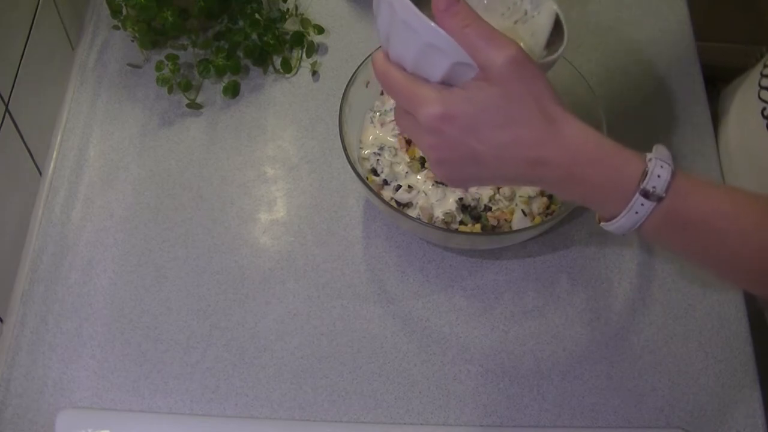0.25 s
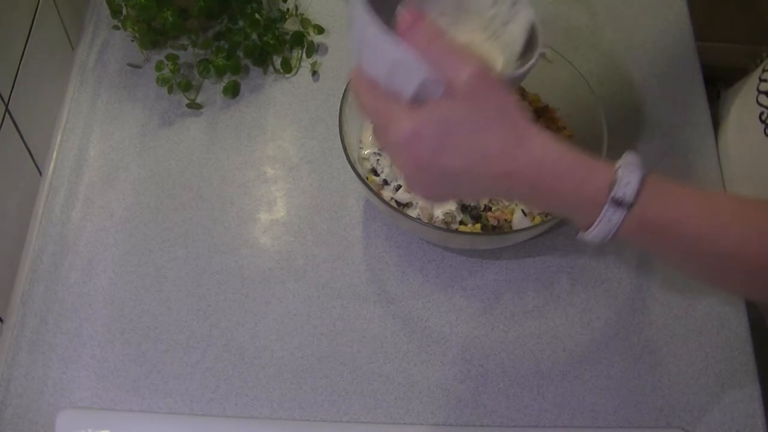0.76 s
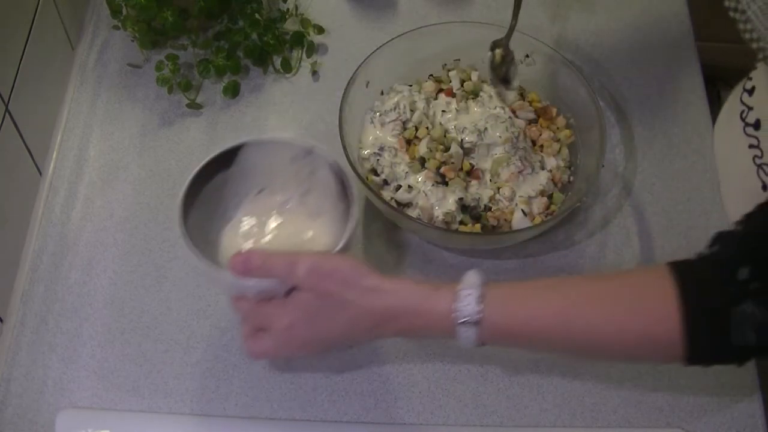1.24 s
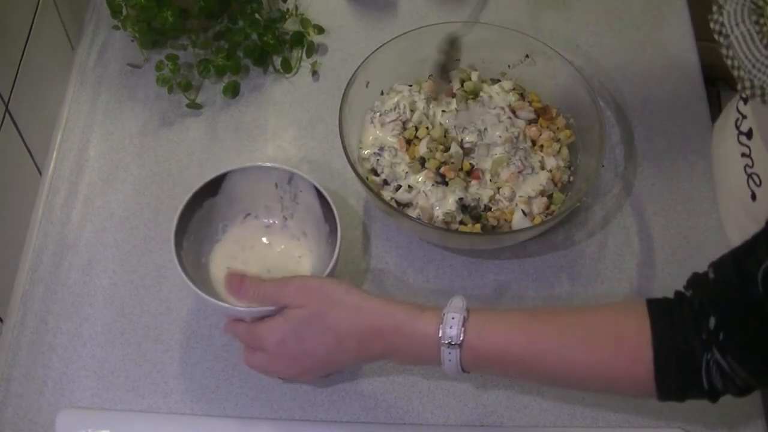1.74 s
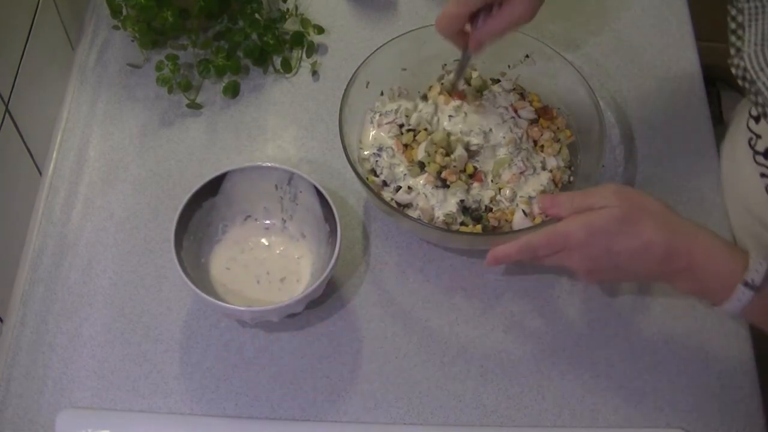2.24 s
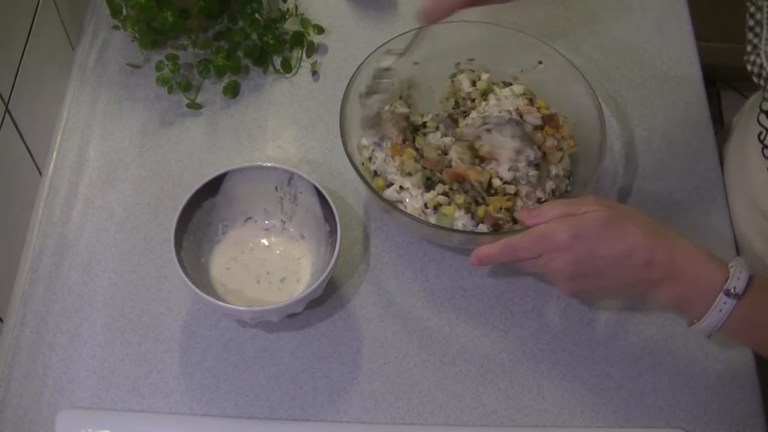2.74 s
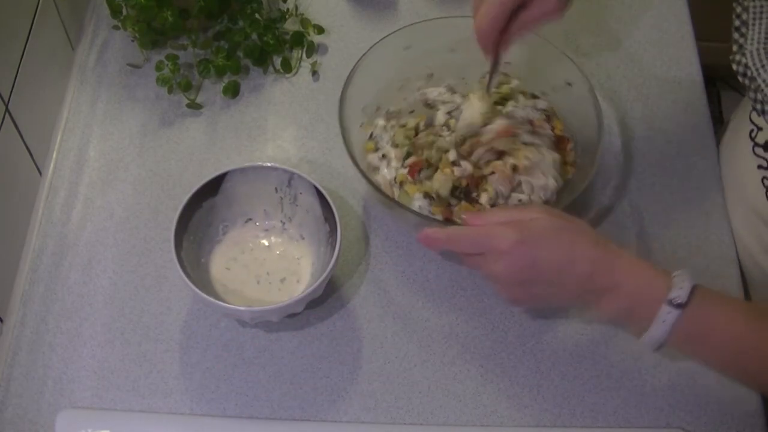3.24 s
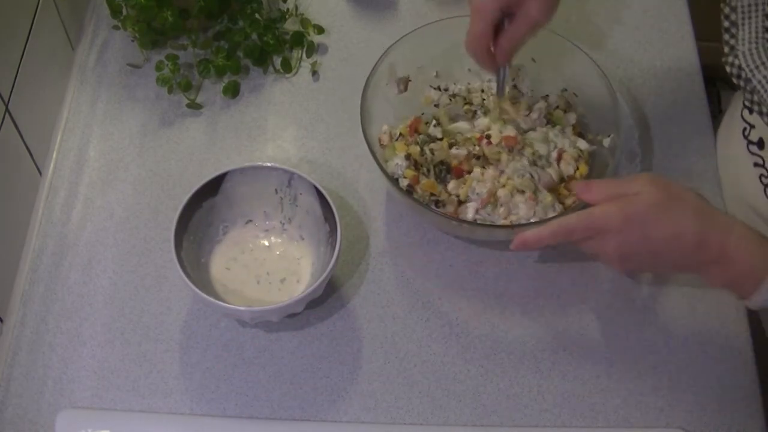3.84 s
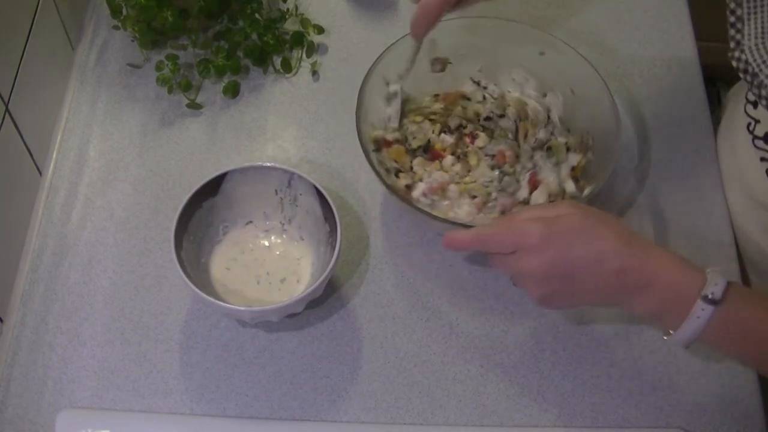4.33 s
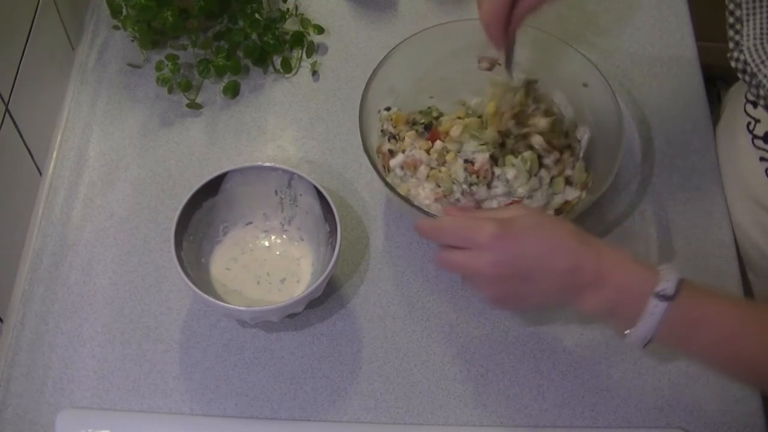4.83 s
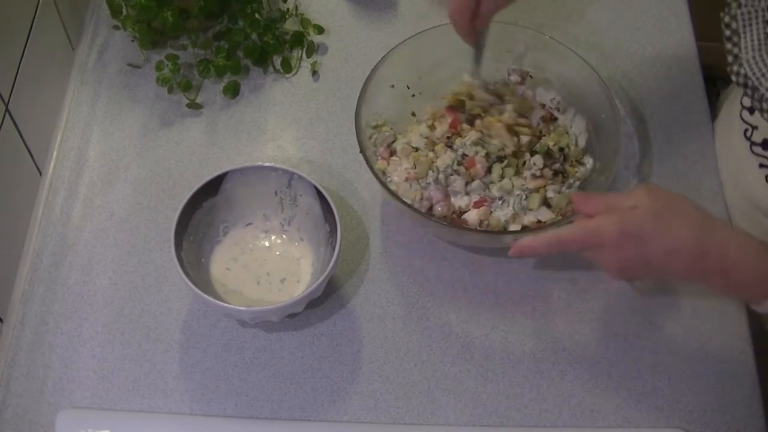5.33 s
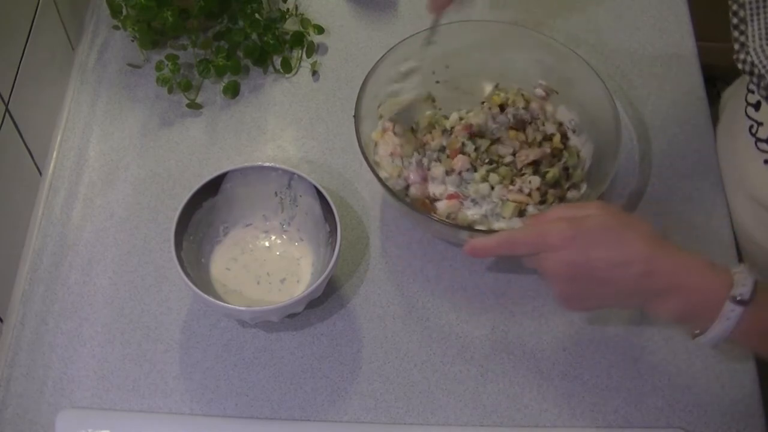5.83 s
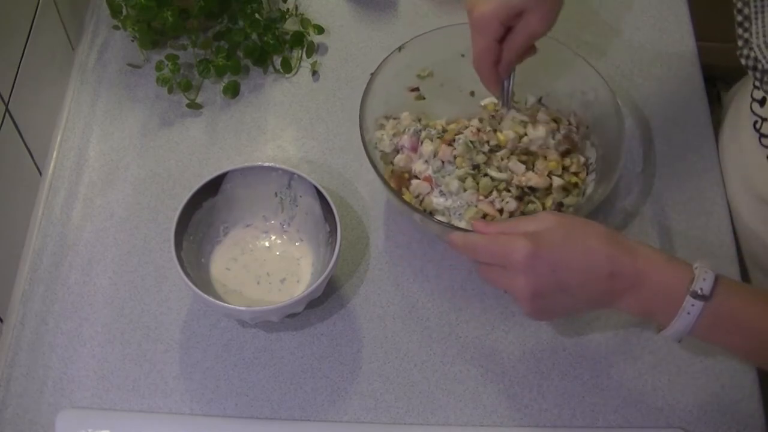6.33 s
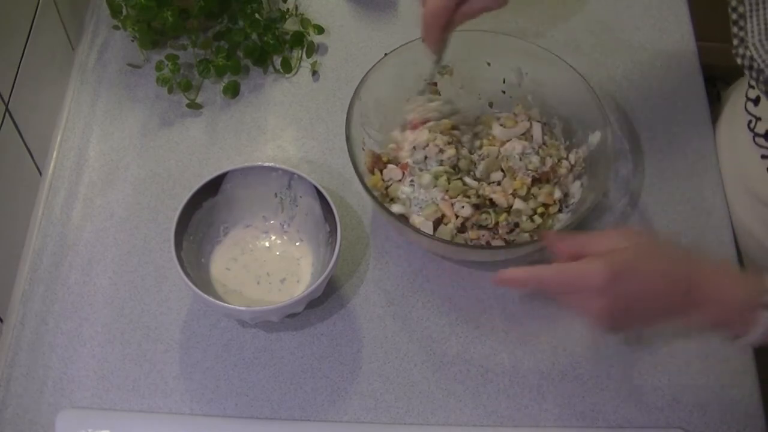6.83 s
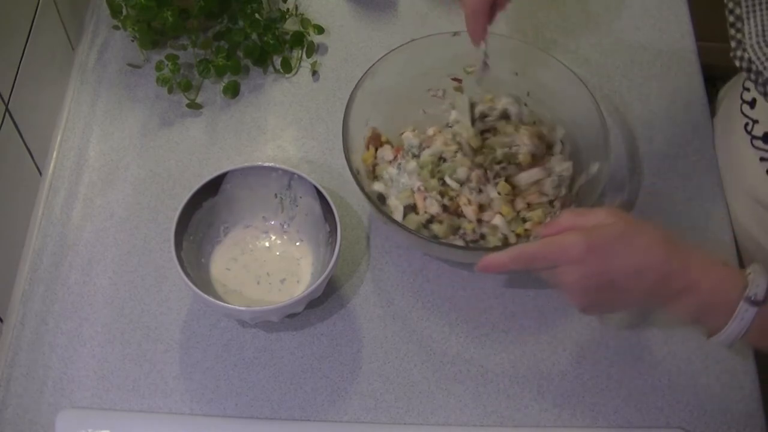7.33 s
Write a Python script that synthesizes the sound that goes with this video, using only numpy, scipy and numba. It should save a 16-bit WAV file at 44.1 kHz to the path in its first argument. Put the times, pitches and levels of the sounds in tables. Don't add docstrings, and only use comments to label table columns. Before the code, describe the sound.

A spoon taps a ceramic cup, the cup thuds onto a counter, then the spoon clinks and scrapes a glass bowl, stirring wet chopped salad.

```python
import sys
import numpy as np
from scipy import signal
from scipy.fft import rfft, irfft
from scipy.io import wavfile
from scipy.ndimage import map_coordinates
from numba import njit

SR = 44100
rng = np.random.default_rng(int(sys.argv[2]) if len(sys.argv) > 2 else 0)


def unload_audio(sound):
    columns = np.transpose(np.atleast_2d(sound))
    steps = np.round(np.clip(columns, -1, 1) * 32767)
    wavfile.write(sys.argv[1], SR, steps.astype(np.int16))


def invert_db(level):
    return 10 ** (np.asarray(level, dtype=float) / 20)


N = 333837
HZ = np.maximum(np.fft.rfftfreq(N, 1 / SR), 1)

# start_s, peak_db, brightness_db_per_octave
SET_DOWN = [
    (1.6476, -6.5, 2.5),
    (1.711, -7, -0.5),
    (1.73, -33, -9),
    (1.75, -15.5, -1),
    (1.789, -17, -2.5),
]
# start_s, peak_db, treble_db, low_db, middle_db
CLINKS = [
    (1.919, -19.5, -22, -7, -18.5),
    (3.5409, -23, -14, -15.5, -18),
    (4.354, -8, -7, -11, -21),
    (5.1534, -15.5, -5, -7, -13),
    (6.7446, -12, 3.5, -6, -2),
]
# start_s, length_s, rub_db, rumble_db
TURNS = [(2.012, 0.2, -54, -55), (2.79, 0.17, -52, -66), (3.186, 0.36, -50, -61), (4.011, 0.55, -58.5, -61),
         (4.877, 0.15, -52.5, -59.5), (5.73, 0.49, -58.5, -66), (6.46, 0.55, -55.5, -62.5),
         (7.25, 0.74, -57.5, -64.5)]
TURN_ATTACK_S, TURN_FADE_DB_PER_S = 0.083, 53
# start_s, length_s, level_db, first_hz, overtone_db
SONGS = [(2.225, 0.04, -44, 2180, 8), (2.907, 0.024, -31, 2050, -24), (2.991, 0.0063, -19.5, 2734, -16),
         (3.791, 0.084, -38, 2980, -17), (4.417, 0.12, -27.5, 2730, -2.5), (4.641, 0.02, -32.5, 3225, -14),
         (5.17, 0.069, -28, 2960, -28), (5.236, 0.035, -28, 2780, -18), (5.29, .08, -33, 2764, 1),
         (5.972, 0.118, -26, 2970, -9), (6.107, 0.034, -27, 2500, -8), (6.87, 0.099, -30, 2740, -3.5),
         (7.04, 0.03, -27, 3300, -20), (2.84, .04, -35, 3050, 0)]


def rms_one(x):
    return x / np.sqrt(np.mean(x ** 2) + 1e-20)


def in_time(rows):
    s, *columns = np.transpose(rows)
    return [np.interp(np.arange(N) / SR, s, c) for c in columns]


def at_hz(points, hz):
    return np.interp(np.log(hz), np.log(np.array(points)[:, 0]), np.array(points)[:, 1])


def coloured(x, spectrum):
    return rms_one(irfft(rfft(x) * invert_db(at_hz(spectrum, HZ)), N))


def drift(rate_per_s):
    knots = rng.standard_normal(4000)
    return map_coordinates(knots, [np.arange(N) * rate_per_s / SR % 3990], order=1)


def grains(per_s, spread_db):
    sizes = invert_db(spread_db * np.minimum(rng.exponential(1, N), 4))
    signs = rng.choice([-1, 1], N)
    return rms_one(sizes * signs * (rng.random(N) < per_s / SR))


def ring(clicks, hz, t60_s):
    r = invert_db(-60 / (max(t60_s, .002) * SR))
    w = 2 * np.pi * hz / SR
    return signal.lfilter([0, np.sin(w)], [1, -2 * r * np.cos(w), r * r], clicks + 1e-18)


@njit
def glide(x, turn, r):
    y = np.zeros(len(x))
    for i in range(2, len(x)):
        y[i] = x[i] - x[i - 2] + 2 * r * turn[i] * y[i - 1] - r * r * y[i - 2]
    return y


def moving_ring(x, hz, width_hz):
    return rms_one(glide(x, np.cos(2 * np.pi * hz / SR), np.exp(-np.pi * width_hz / SR)))


def band(x, low_hz, high_hz):
    return rms_one(signal.sosfilt(signal.butter(4, [low_hz, high_hz], "band", fs=SR, output="sos"), x))


def in_band(x, low_hz, high_hz):
    return signal.sosfilt(signal.butter(2, [low_hz, high_hz], "band", fs=SR, output="sos"), x)


def above(x, hz):
    return signal.sosfilt(signal.butter(3, hz, "high", fs=SR, output="sos"), x)


def train(rows, db):
    clicks = np.zeros(N)
    clicks[[round(row[0] * SR) for row in rows]] = invert_db(db)
    return clicks


def swells(rows, db, attack_s, fade_db_per_s):
    t, gain = np.arange(0, N + 16, 16) / SR, 0
    for (s, length_s, *_), level_db in zip(rows, db):
        rise = np.clip((t - s) / max(attack_s, .001), 0, 1) ** 2
        fade_db = fade_db_per_s * np.maximum(t - s - length_s, 0)
        gain = np.hypot(gain, rise * invert_db(level_db - fade_db))
    return np.interp(np.arange(N) / SR, t, gain)


def pair(alike):
    mid, side = rfft(rng.standard_normal((2, N)))
    share = np.clip(at_hz(alike, HZ), 0, 1)
    return irfft(np.sqrt(1 + share) * mid + np.sqrt(1 - share) * side * [[1], [-1]], N)


def room_floor():
    # hz, db_per_hz
    floor_spectrum = [(12, -52.5), (20, -32), (165, -15.5), (230, 1), (265, -10.5), (361, -1.5),
                      (709, -9.5), (1350, -8), (1470, -6), (2890, -1), (4410, -9.5), (5210, -6), (6710, -7),
                      (15200, -18), (16500, -22)]
    # hz, left_right_likeness
    floor_alike = [(60, 0.86), (300, 0.1), (2000, 0.38), (6000, 0.21), (14000, 0.091)]
    return invert_db(-58 + 1.4 * drift(3.8)) * coloured(pair(floor_alike), floor_spectrum)


def fan():
    # pitch_hz, width_hz, level_db
    whistles = [(2480, 260, -68), (2960, 60, -78), (5310, 90, -75), (7810, 50, -80)]
    air = rng.standard_normal((2, N))
    out = 0
    for hz, width_hz, db in whistles:
        whistle = ring(air[0] + .6 * air, hz, 2.2 / width_hz)
        out = out + invert_db(db) * rms_one(above(whistle, 1500))
    return out


def kitchen(x):
    # hz, t60_s
    room_t60 = [(150, 0.57), (600, 0.48), (2000, 0.43), (6000, 0.44), (14000, 0.28)]
    # hz, left_right_likeness
    room_alike = [(150, 0.87), (1000, 0.88), (3000, 0.82), (8000, 0.12)]
    length, edges_hz = SR * 3 // 4, 90 * 2 ** np.arange(0, 8.0)
    white, t, tail = pair(room_alike)[:, :length], np.arange(length) / SR, 0
    for low, high in zip(edges_hz, np.minimum(2 * edges_hz, .45 * SR)):
        decay = invert_db(-60 * t / at_hz(room_t60, np.sqrt(low * high)))
        tail = -tail + in_band(white, low, high) * decay
    tail = tail * np.clip(t / 0.0066 - .4, 0, 1)
    return signal.fftconvolve(x[None], tail / np.sqrt(np.sum(tail[0] ** 2)))[:, :N]


def ports(x):
    # hz, left_minus_right_db
    balance = [(60, 0.5), (110, 2.5), (200, 3), (380, -0.5), (700, 1), (1290, 0.5), (2380, 0.5), (4400, -2),
               (8120, 4.5), (15000, -1)]
    # hz, left_lead_rad
    lead = [(0, 0), (3360, 0.36), (3700, 0.75), (4570, 0.41), (5510, 1), (6800, -2.55), (8100, 0.99),
            (9390, 1), (9990, -1.8), (11000, 1), (13200, 1), (14200, 0.62), (15300, 0.0), (16500, 0.46)]
    half = invert_db(at_hz(balance, HZ) / 2) * np.exp(.5j * at_hz(lead, HZ))
    return irfft(rfft(x) * np.array([half, 1 / half]), N)


def thump():
    blows = train(CLINKS, np.array(CLINKS)[:, 1] - 64) + train(SET_DOWN, np.array(SET_DOWN)[:, 1] - 62)
    return ring(blows, 38, 0.25) + invert_db(2) * ring(blows, 62, 0.15) + invert_db(-6) * ring(blows, 120, 0.08)


def panel():
    # mode_hz, level_db, t60_s
    panel_modes = [(337, -39, .12), (401, -23.5, 0.13), (525, -14, 0.061), (620, -24, 0.069),
                   (752, -33, 0.14), (858, -24, 0.12), (963, -22, 0.065)]
    chance_db = rng.normal(0, 2.1, (len(panel_modes), len(SET_DOWN)))
    peak_db = np.array(SET_DOWN)[:, 1]
    out = np.zeros(N)
    for (hz, db, t60_s), spread_db in zip(panel_modes, chance_db):
        out += ring(train(SET_DOWN, peak_db + db + spread_db), hz, t60_s)
    return out


def set_down():
    # hz, db_per_hz
    thud_spectrum = [(120, -40), (180, -25), (350, -7), (600, -1), (900, -2), (1400, -1.5), (2000, -5),
                     (2800, 0.5), (4000, -13), (6000, -9), (8000, -24), (15000, -26)]
    # hz, t60_s
    thud_t60 = [(200, 0.044), (1000, 0.098), (3000, 0.013), (10000, 0.0049)]
    out, span, edges_hz = np.zeros(N), SR // 4, 130 * 2 ** np.arange(0, 7, .5)
    t, click = np.arange(span) / SR, signal.unit_impulse(span)
    for s, db, tilt_db in SET_DOWN:
        thud, white = 0, rng.standard_normal(span)
        for low, high in zip(edges_hz, edges_hz[1:]):
            hz = np.sqrt(low * high)
            drive = 8.2 * click + white * invert_db(-60 * t / at_hz(thud_t60, hz))
            gain = invert_db(at_hz(thud_spectrum, hz) + tilt_db * np.log2(hz / 1000))
            thud = -thud + gain * in_band(drive, low, high)
        out[round(s * SR):][:span] += invert_db(db) * thud / np.abs(thud).max()
    return out


def cup():
    # start_s, peak_db
    taps = [
        (0.611, -15),
        (0.7018, -14.5),
    ]
    # start_s, length_s, level_db
    drags = [
        (0.607, .004, -23.5),
        (0.699, 0.0049, -20),
        (0.74, 0.038, -31.5),
        (0.818, 0.045, -67),
    ]
    # mode_hz, first_tap_db, second_tap_db, t60_s
    cup_modes = [(1176.4, -9.5, -10.5, 0.13), (2230, -13, -43, 0.12), (2496, 5.5, -19, 0.047),
                 (2553, -25, -5.5, 0.066), (2873, -12, -8, 0.055), (2954, 4, -3, 0.06),
                 (3330, -6, -13, 0.043), (3770, 4.5, -11, 0.023), (4650, -10, -18, 0.037),
                 (5290, 1, -9.5, 0.026), (5390, -9, 2.5, 0.028), (5600, -34, -40, .06),
                 (7630, -14, -17, 0.054), (7900, -37, -35, .08)]
    drag_gain = swells(drags, np.array(drags)[:, 2], attack_s=0.0058, fade_db_per_s=486)
    drag = drag_gain * grains(7300, spread_db=4.0)
    level_db = np.array(taps)[:, 1] - 9
    out = .8 * train(taps, level_db) + invert_db(-10) * in_band(drag, 1450, 4800)
    for hz, first_db, second_db, t60_s in cup_modes:
        struck = train(taps, level_db + [first_db, second_db])
        out += ring(struck + invert_db(second_db - 28.5) * drag, hz, t60_s)
    return above(out, 1160)


def turning():
    # hz, db_per_hz
    rumble_spectrum = [(24, -70), (40, -40), (141, -46), (206, -19), (377, -5), (460, -6), (1010, -2),
                       (1500, -7.5), (1950, 2), (3300, -120)]
    # start_s, level_db
    nudges = [(2.438, -64), (2.801, -57.5), (3.0, -55), (3.54, -63), (4.355, -49.5), (5.153, -55),
              (5.549, -66), (5.958, -53.5), (6.36, -59), (6.746, -53), (7.129, -55)]
    lumps = grains(900, spread_db=0.5) * invert_db(3.0 * drift(22))
    base = swells(TURNS, np.array(TURNS)[:, 3], TURN_ATTACK_S, TURN_FADE_DB_PER_S)
    settling = swells(TURNS[:1], [-67.5], TURN_ATTACK_S, 0)
    pushes = [(s, 0.0082) for s, _ in nudges]   # start_s, length_s
    rock = swells(pushes, np.array(nudges)[:, 1], attack_s=0.0022, fade_db_per_s=200)
    return (base + settling) * coloured(lumps, rumble_spectrum) + rock * band(lumps, 170, 900)


def knocks():
    # start_s, peak_db, ring_hz, treble_db
    high_knocks = [(1.028, -40.5, 4800, -10), (1.409, -43, 2300, 17), (1.418, -43, 5200, 18),
                   (2.5457, -41, 5000, -24), (2.844, -31.5, 3020, -4.5), (2.9988, -17, 2200, -30),
                   (3.0048, -9, 2750, -16), (3.8124, -22, 3150, -23), (3.8486, -14.5, 3100, -32),
                   (4.3525, -11, 4400, 6), (4.3565, -8, 2840, 2), (4.8552, -33.5, 2900, -18),
                   (5.1511, -14, 3800, 6), (5.1555, -15, 2800, 0), (5.141, -34, 4500, -15),
                   (5.9605, -26, 4450, -10), (6.122, -19, 3150, -31), (6.4187, -38, 3540, -23),
                   (6.7443, -9, 3850, 4), (6.885, -20, 2800, -17), (7.3351, -38.5, 3850, -3),
                   (7.441, -41, 5130, -13), (7.355, -41, 7200, 0), (7.464, -39, 7000, -2),
                   (4.2, -44, 4500, -8), (5.69, -40, 5600, 2), (7.194, -40, 6800, -4),
                   (7.266, -39, 6760, -12)]
    # start_s, peak_db, ring_hz, treble_db
    deep_knocks = [(2.163, -29, 2000, -6), (2.266, -34, 2300, -25), (2.3395, -19, 2030, -32),
                   (2.9145, -28, 2020, -16), (3.679, -34, 3050, -18), (4.6017, -15.5, 2940, -9),
                   (4.6897, -18.5, 3200, -36), (4.9786, -44, 3180, 16), (5.541, -32, 2300, -17),
                   (6.085, -22, 4270, -26), (6.17, -16, 2980, -30), (6.2063, -15.5, 2100, -11),
                   (6.2592, -11, 3540, -6), (6.29, -27, 3850, -18), (6.3155, -16.5, 3270, -33),
                   (7.0523, -27, 3740, -8), (7.08, -21, 3540, -30)]
    # mode_hz, level_db, t60_s
    damped_modes = [(2100, -34, 0.087), (3060, -14, 0.02), (4073, 3, 0.0063), (5250, -31, 0.0044),
                    (5020, 2, 0.0026)]
    rows = [(*row, -50) for row in high_knocks] + [(*row, -19) for row in deep_knocks]
    out, span = np.zeros(N), 1800
    chance_db = rng.normal(0, 4.0, (len(rows), len(damped_modes)))
    decay = invert_db(-60 * np.arange(span) / SR / 0.018)
    bounces = rng.standard_normal((len(rows), span))
    for k, (s, db, hz, treble_db, hollow_db) in enumerate(rows):
        contact = 0.56 * signal.unit_impulse(span) + 0.32 * bounces[k] * decay
        wall = 0
        for (mode_hz, mode_db, t60_s), spread_db in zip(damped_modes, chance_db[k]):
            wall = wall + invert_db(mode_db + spread_db) * ring(contact, mode_hz, t60_s)
        hit = in_band(wall + invert_db(3) * ring(contact, hz, .006), 1700, 7500)
        hollow = above(ring(contact, 1396, 0.033), 1070)
        crack = in_band(bounces[k], 7000, 12600) * decay
        layers = hit / np.abs(hit).max() + invert_db(hollow_db) * hollow / np.abs(hollow).max()
        layers = layers + invert_db(treble_db - 13.5) * crack
        out[round(s * SR):][:span] += invert_db(db) * layers
    return out


def clinks():
    # mode_hz, level_db, t60_s, split_hz
    bowl_modes = [(400, -26, 0.16, 30), (925, -27.5, 0.38, 14.5), (1033, -27.5, 0.42, 5.2),
                  (1846, 2.5, 0.32, 8.7), (2768, 2.5, 0.13, 10.8), (3560, -22, 0.12, 60),
                  (3850, 12.5, 0.16, 36), (4500, -24, 0.12, 35), (5100, 4, 0.09, 17), (5300, -9, 0.15, 45),
                  (5700, -1, .1, 170), (6400, -8, 0.16, 20), (7310, -10, 0.17, 60), (7580, -9, .1, 70),
                  (7800, -8, 0.17, 79), (7950, -7.5, 0.19, 39), (7994, -4, 0.24, 81), (8370, -8, 0.11, 92),
                  (11000, -7, 0.066, 56), (10870, -37.5, 0.032, 110), (13000, -37, 0.11, 90),
                  (14800, -13, .07, 120)]
    # start_s, length_s, level_db
    chatter = [
        (6.755, 0.063, -57),
        (5.157, .03, -73),
        (4.365, 0.042, -72),
    ]
    # time_s, gain_db
    sinking = [
        (6.835, 1.5),
        (6.85, -12),
    ]
    _, level_db, treble_db, low_db, middle_db = np.transpose(CLINKS)
    high_db = -7 + 0.1 * treble_db
    body, rim, bright = np.zeros((3, N))
    rub = swells(chatter, np.array(chatter)[:, 2], 0.012, 600) * grains(1500, spread_db=3.0)
    groups_db = [0, low_db, 0, middle_db, high_db, treble_db]
    for hz, db, t60_s, split_hz in bowl_modes:
        colour_db = groups_db[np.searchsorted([1300, 2300, 3300, 4300, 6000], hz)]
        chance_db = rng.normal(0, 1.5, (2, len(CLINKS)))
        rub_db = db - 29 * abs(np.log2(hz / 2800))
        heard = body if hz < 1300 else rim if hz < 7000 else bright
        for side, spread_db in zip((-.5, .5), chance_db):
            blows = train(CLINKS, level_db + colour_db + db - 14.5 + spread_db)
            heard += ring(blows + invert_db(rub_db) * rub, hz + side * split_hz, t60_s)
    shimmer = invert_db(4.5 * drift(90) - 3)
    return invert_db(in_time(sinking)[0]) * (above(body, 320) + above(rim, 1330) + shimmer * bright)


def slips():
    # peak_s, peak_db, ring_hz
    slip_events = [(2.266, -33, 2110), (2.917, -30, 2030), (2.9277, -25, 2700), (2.9346, -28, 2790),
                   (3.8718, -30, 2920), (4.4044, -22, 2800), (4.4232, -24, 2780), (4.4272, -24, 2720),
                   (4.4533, -21, 2760), (4.4578, -24, 2250), (4.4691, -25, 2240), (4.4904, -26, 2760),
                   (4.5165, -27, 2240), (4.5278, -26, 2270), (4.5404, -26, 2110), (4.6631, -31, 3060),
                   (5.2067, -25, 2730), (5.2156, -26, 2750), (5.225, -27, 2710), (5.2402, -21, 2730),
                   (5.2459, -19, 2680), (5.2611, -20, 2660), (5.2656, -20, 2420), (5.2708, -20, 2400),
                   (5.2798, -18, 2710), (5.2866, -23, 2360), (5.298, -24, 2750), (5.3204, -28, 2310),
                   (5.3249, -26, 2240), (5.3297, -27, 2900), (5.3446, -28, 2470), (5.3802, -29, 2470),
                   (5.9762, -30, 2920), (5.9802, -29, 2830), (5.9965, -26, 2810), (6.003, -23, 2650),
                   (6.0154, -26, 2820), (6.0348, -24, 2560), (6.0429, -24, 2120), (6.0678, -22, 2590),
                   (6.0757, -21, 2790), (6.0854, -20, 2580), (6.0902, -24, 2620), (6.1114, -28, 2350),
                   (6.131, -25, 2490), (6.2131, -29, 2010), (6.2703, -27, 2130), (6.2938, -30, 3320),
                   (6.3222, -30, 2850), (6.8654, -28, 2780), (6.8712, -27, 2730), (6.8932, -24, 2730),
                   (6.8995, -28, 2570), (6.912, -27, 2300), (6.9265, -26, 2750), (6.9356, -29, 2720),
                   (6.9717, -29, 1920), (6.98, -29, 2260), (7.0507, -27, 2620), (7.0565, -23, 2640),
                   (2.2578, -34, 4150), (2.8608, -36, 5090), (2.9325, -33, 4070), (2.9874, -34, 4300),
                  (3.0181, -28, 4010), (3.0244, -31, 4010), (3.0436, -33, 3780), (3.8201, -35, 3490),
                  (3.8587, -33, 4100), (3.8679, -33, 3980), (4.3922, -27, 5300), (4.4062, -28, 5580),
                  (4.4157, -30, 5050), (4.4407, -29, 5240), (4.452, -25, 5260), (4.4662, -28, 5210),
                  (4.4763, -29, 5320), (4.5029, -31, 5060), (4.5229, -29, 5070), (4.5341, -25, 4960),
                  (4.5402, -28, 4900), (4.5459, -30, 4100), (4.6581, -34, 3630), (4.6636, -35, 4120),
                  (5.2047, -32, 3660), (5.2085, -34, 3690), (5.2602, -33, 3970), (5.2791, -28, 5230),
                  (5.2835, -20, 5380), (5.2911, -23, 5450), (5.3038, -28, 5140), (5.3233, -30, 5090),
                  (5.3382, -29, 4940), (5.3586, -32, 5040), (5.3895, -33, 4940), (6.0337, -31, 4260),
                  (6.0451, -28, 4300), (6.052, -29, 5030), (6.0681, -27, 5030), (6.0857, -26, 4270),
                  (6.0943, -32, 4440), (6.1029, -33, 4380), (6.138, -30, 5000), (6.1882, -32, 4210),
                  (6.2372, -32, 3990), (6.2478, -31, 4050), (6.2917, -26, 3850), (6.9167, -31, 5040),
                  (6.9217, -30, 4060), (6.9372, -29, 4090), (6.9511, -28, 4150), (6.9559, -30, 4130),
                  (6.97, -33, 4170), (7.0182, -34, 4400), (7.0472, -30, 3660), (7.0545, -28, 3820),
                  (7.0861, -32, 3390), (7.11, -32, 3520), (7.1148, -32, 4030), (7.1224, -34, 3940)]
    rise_s, t60_s = .0016, .018
    out, t = np.zeros(N), np.arange(1500) / SR
    rise = np.sin(np.pi / 2 * np.minimum(t / rise_s, 1)) ** 2
    shape = rise * invert_db(-60 * np.maximum(t - rise_s, 0) / t60_s)
    rows = slip_events
    for (s, db, hz), phase in zip(rows, rng.random(len(rows))):
        slip = shape * np.sin(2 * np.pi * (hz * t + phase))
        out[round((s - rise_s) * SR):][:len(t)] += invert_db(db + 0.5) * slip
    return out


def patches(grit, low_hz, high_hz, count, patchy_db):
    out = 0
    for k, hz in enumerate(np.geomspace(low_hz, high_hz, count)):
        out = out + (-1) ** k * invert_db(patchy_db * drift(14)) * ring(grit, hz, 28 / hz) * hz
    return band(out, 1.117 * low_hz, 1.286 * high_hz)


def song(grit, db, ratio, width_hz):
    sag_hz_per_s = 3060
    curve = []
    for s, length_s, _, first_hz, _ in sorted(SONGS):
        for late_s in (0, length_s):
            curve.append((s + late_s, ratio * (first_hz - sag_hz_per_s * late_s)))
    hz, = in_time(curve)
    upper = moving_ring(moving_ring(grit, hz, width_hz), hz, width_hz)
    twin = moving_ring(moving_ring(grit, 0.855 * hz, width_hz), 0.857 * hz, width_hz)
    twin = invert_db(3.0 * drift(12)) * twin
    return swells(SONGS, db - 11, attack_s=0.0073, fade_db_per_s=500) * (upper + 0.66 * twin)


def slide():
    # start_s, length_s, pressure_db, loaded_wall_db, hiss_db
    strokes = [(2.15, 0.13, -67, -1, -4), (2.243, 0.17, -55.5, 5.5, -3.5), (2.838, .045, -52, 0, -12),
               (2.9, 0.061, -47, 4, -7), (2.984, 0.024, -42, -19, -4.5), (3.575, 0.31, -57.5, -3.5, -9),
               (3.776, 0.095, -47, 3.3, -12), (4.377, .17, -43.5, 0, -4.5), (4.582, 0.12, -46.5, 6, -10),
               (5.165, 0.17, -41, -14, -6.5), (5.347, 0.15, -45, 1, -9), (5.96, 0.095, -49.5, 12.5, -6),
               (6.017, 0.18, -41.5, 1, -6), (6.168, 0.15, -46.5, 5.5, -4), (6.742, .08, -37, -6, -14),
               (6.85, 0.14, -42.5, -1, -7), (7.03, .09, -44, 2, -4), (1.395, .05, -58, 0, -3),
               (1.91, .06, -52, 5, -8)]
    # hz, db_per_hz
    hiss_spectrum = [(5500, -30), (6600, -7), (7700, 1), (8500, -4), (9300, -17), (10800, -10),
                     (12200, -17), (15500, -18), (16600, -45)]
    attack_s, loading_s, fade_db_per_s = 0.016, 0.077, 256
    _, _, db, loaded_db, hiss_db = np.transpose(strokes)
    rub = swells(TURNS, np.array(TURNS)[:, 2], TURN_ATTACK_S, TURN_FADE_DB_PER_S)
    low = swells(strokes, db + loaded_db, loading_s, fade_db_per_s) + rub
    middle = swells(strokes, db, attack_s, fade_db_per_s) + invert_db(-4) * rub
    hiss = swells(strokes, db + hiss_db, attack_s, fade_db_per_s) + invert_db(-13) * rub
    grit = grains(2500, spread_db=3.0) * invert_db(2.4 * drift(90))
    low = low * patches(grit, 1450, 3400, count=8, patchy_db=3.0)
    middle = middle * patches(grit, 3300, 5600, count=7, patchy_db=3.0)
    hiss = hiss * invert_db(2.2 * drift(40)) * coloured(grit, hiss_spectrum)
    _, _, song_db, _, over_db = np.transpose(SONGS)
    songs = song(grit, song_db, ratio=1, width_hz=240)
    songs = songs + song(grit, song_db + over_db, ratio=1.9, width_hz=600)
    return low + middle + hiss + above(songs, 670)


def scene():
    near = cup() + clinks() + knocks() + slide() + turning() + slips()
    thud = above(set_down() + panel(), 175)
    tail = kitchen(invert_db(-5.5) * near + invert_db(-2) * thud)
    return above(ports(near + thud) + tail, 117) + room_floor() + fan() + thump()


def roll_off(x):
    return signal.sosfilt(signal.butter(12, 16990, fs=SR, output="sos"), x)


def record(dry):
    rounded = dry / np.sqrt(np.sqrt(1 + (dry / .9) ** 4))
    top_cut = signal.cheby2(10, 50, 16900, fs=SR, output="sos")
    return roll_off(signal.sosfilt(top_cut, rounded))


dry = scene()
out = record(dry)
unload_audio(out)
```